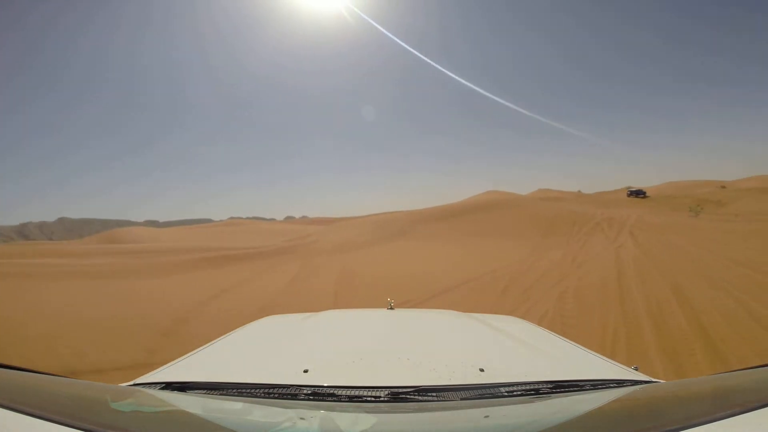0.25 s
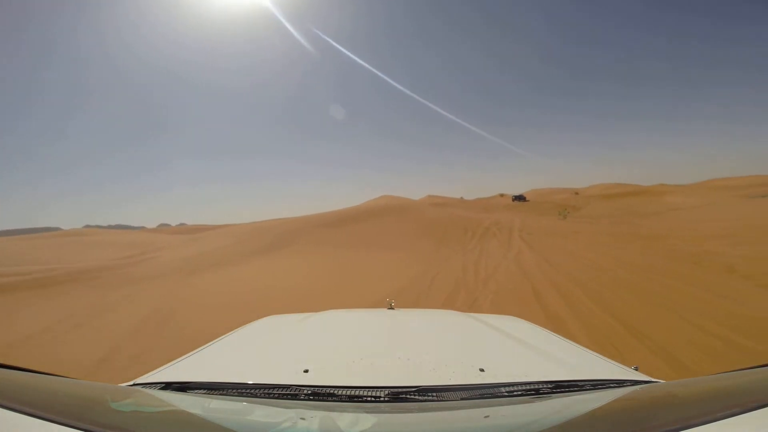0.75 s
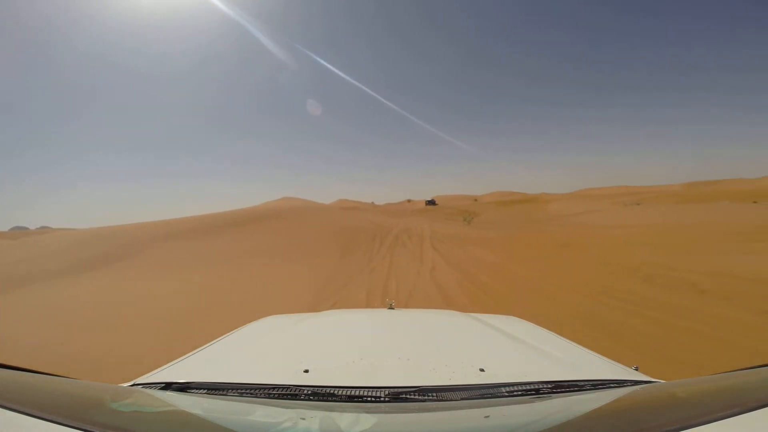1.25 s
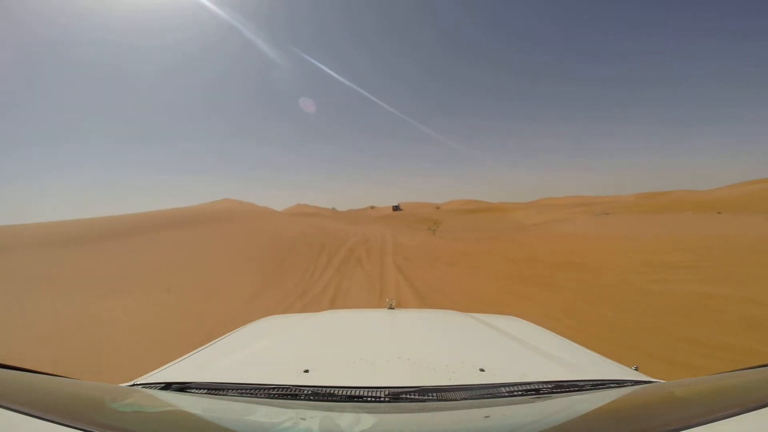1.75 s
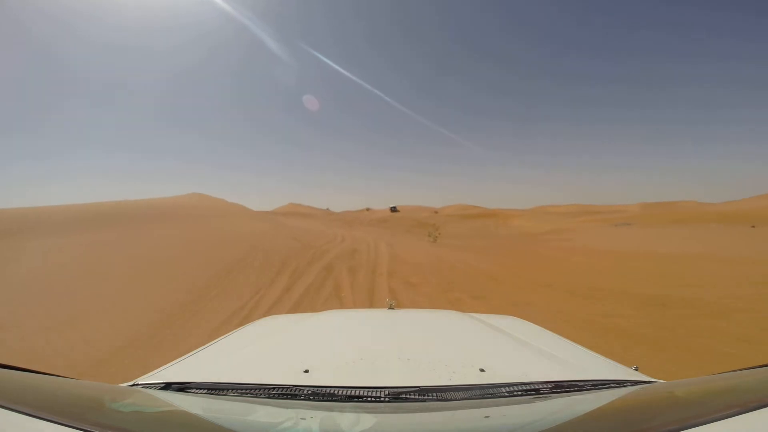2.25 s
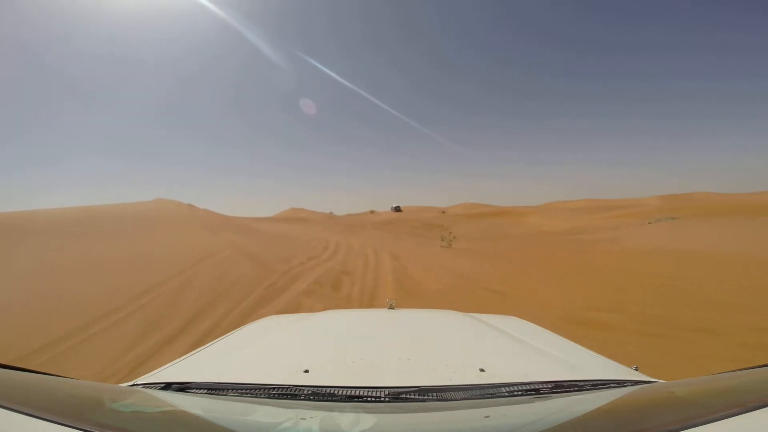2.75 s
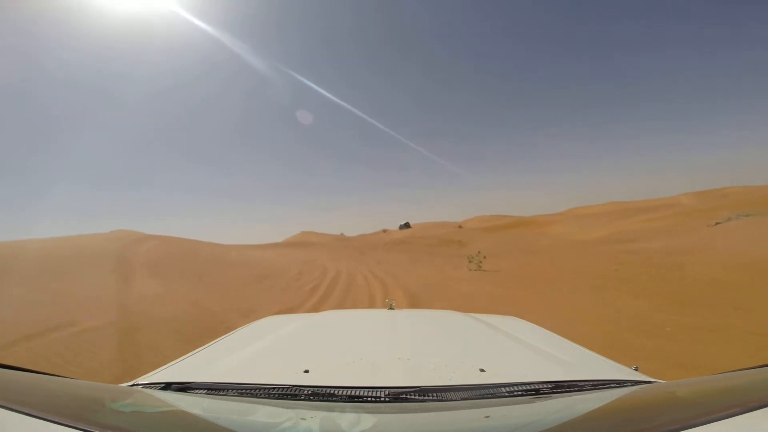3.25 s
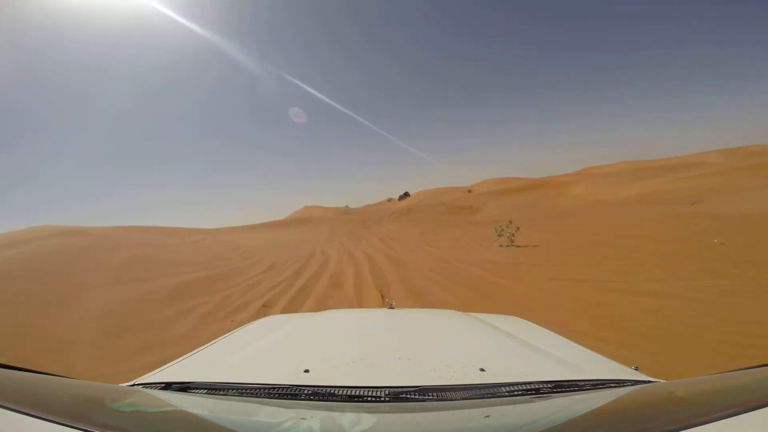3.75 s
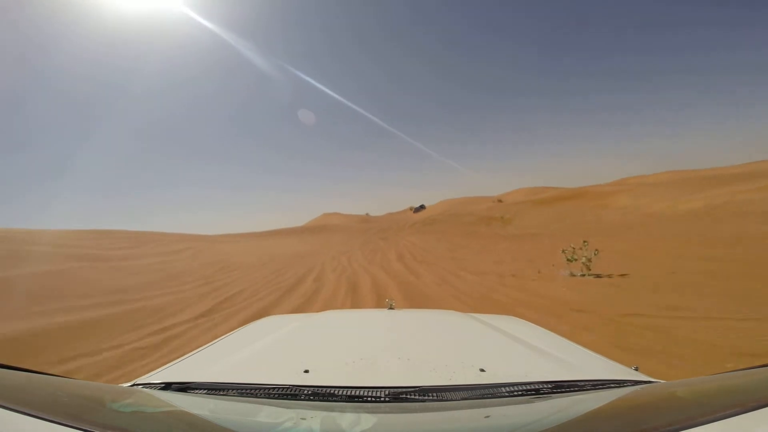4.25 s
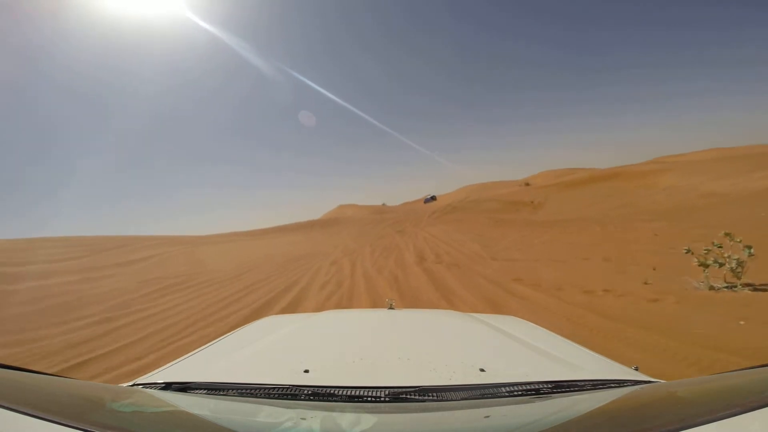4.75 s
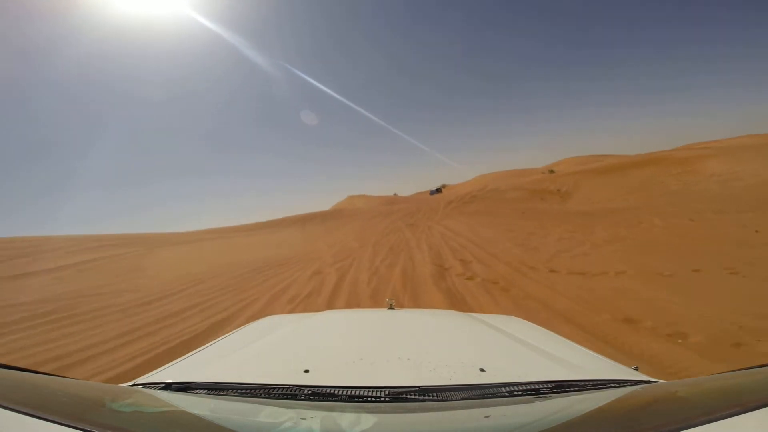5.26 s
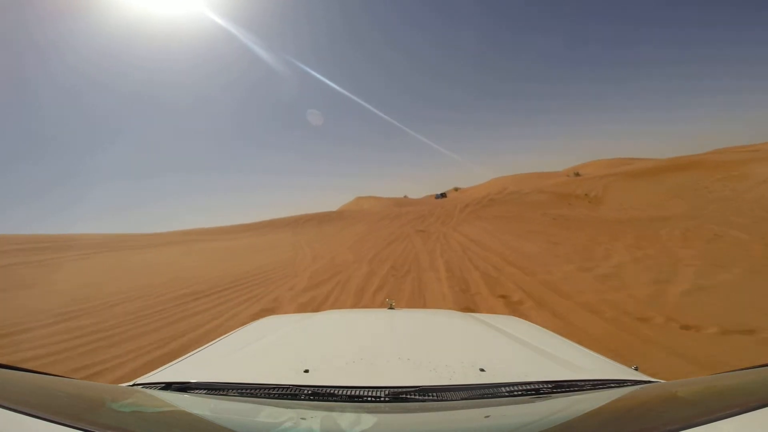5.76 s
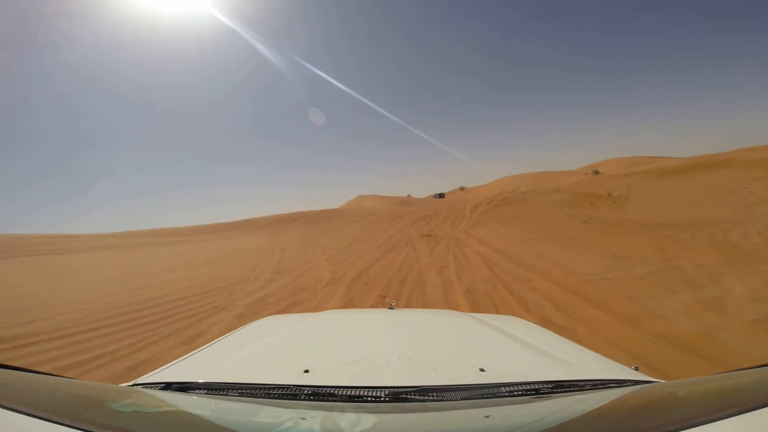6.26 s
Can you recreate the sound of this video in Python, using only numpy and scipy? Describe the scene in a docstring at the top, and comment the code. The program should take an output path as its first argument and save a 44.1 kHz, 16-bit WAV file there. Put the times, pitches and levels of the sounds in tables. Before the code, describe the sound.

A small camera mounted at the windscreen captures a bumpy dune drive: throbbing low cabin boom, rumbling floor, soft engine hum and fluttering air noise coloured by its plastic case. Early squeaks give way to a dry burst of mount crackle around two seconds, then scattered knocks and jolts, fuller hollow wind, sprays of sand hiss, and finally patchy creaking and little squeaks. A faint electronic whine lies beneath.

```python
"""The cabin boom comes first: a tone near 40 Hz that swells again and again as a car rolls over soft dunes.
Under it runs the engine, a sine firing note with two overtones; floor rumble, whoosh, roar and hiss are
shaped noise, roar and hiss coloured by the plastic case of a small camera at the windscreen.
Stick-slip clicks ring the modes of creaking trim and of the crackling mount, and rubbed tones squeak.
A thin electronic whine and microphone noise lie beneath."""
import sys
import numpy as np
from scipy import signal
from scipy.fft import rfft, irfft
from scipy.io import wavfile

SR = 44100
rng = np.random.default_rng(int(sys.argv[2]) if len(sys.argv) > 2 else 0)


def unload_wav(signal):
    """Save mono or channel-first audio to the path in sys.argv[1] as 16-bit WAV at rate SR, clipped to [-1, 1]."""
    wavfile.write(
        sys.argv[1],
        SR,
        np.round(np.clip(np.atleast_2d(signal).T, -1, 1) * 32767).astype(np.int16),
    )


N = 287532  # samples


def from_db(db):
    """Decibels to gain."""
    return 10 ** (np.asarray(db) / 20)


def rms_one(x):
    """Scaled to rms 1."""
    return x / np.sqrt(np.mean(x ** 2) + 1e-20)


def in_time(rows):
    """Columns of a breakpoint table, interpolated to every sample."""
    s, *columns = np.transpose(rows)
    return [np.interp(np.arange(N) / SR, s, c) for c in columns]


def drift(rate_hz):
    """Slow random wander of rms 1: noise through a double one-pole low-pass."""
    r = np.exp(-2 * np.pi * rate_hz / SR)
    settled = signal.lfilter([1], [1, -2 * r, r * r], rng.standard_normal(N + SR))[SR:]
    return rms_one(settled)


def coloured(spectrum, lifts=()):
    """Noise of rms 1 with a given spectrum and resonant lifts or dips."""
    hz = np.arange(1, N // 2 + 2) * SR / N
    point_hz, point_db = np.transpose(spectrum)
    db = np.interp(np.log(hz), np.log(point_hz), point_db, left=-99, right=-99)
    for centre_hz, width_hz, lift_db in lifts:
        db = db + lift_db / (1 + (2 * (hz - centre_hz) / width_hz) ** 2)
    return rms_one(irfft(rfft(rng.standard_normal(N)) * from_db(db), N))


def filtered(x, order, edge_hz, kind):
    """Butterworth filter."""
    return signal.sosfilt(signal.butter(order, edge_hz, kind, fs=SR, output="sos"), x)


def ring(clicks, hz, t60_s):
    """A resonant mode: a unit click starts a decaying sine of height near 1."""
    r = from_db(-60 / (t60_s * SR))
    w = 2 * np.pi * hz / SR
    return signal.lfilter([0, np.sin(w)], [1, -2 * r * np.cos(w), r * r], clicks + 1e-18)


def tone(hz):
    """A sine of rms 1 that follows a pitch curve."""
    turns = np.cumsum(hz * np.ones(N)) / SR + rng.random()
    return np.sqrt(2) * np.sin(2 * np.pi * turns)


def hump(centre_hz, width_hz):
    """A sliding band of noise: low-passed noise carried on a moving tone; rms 1."""
    phase = 2 * np.pi * np.cumsum(centre_hz) / SR
    slow = filtered(rng.standard_normal((2, N)), 3, width_hz / 2, "low")
    return rms_one(slow[0] * np.cos(phase) + slow[1] * np.sin(phase))


def slips(per_s, uneven_db):
    """Stick-slip clicks of either sign at random moments, uneven in size."""
    born = rng.random(N) < per_s / SR
    size = from_db(uneven_db * np.minimum(rng.exponential(1, N), 4))
    return born * size * rng.choice([-1, 1], N)


def swells(rows, edge_s, fall_s=None):
    """Sum of rounded swells, timed at half height; one shorter than its edges stays below full height."""
    rise_s, fall_s = edge_s, fall_s or edge_s
    out = np.zeros(N)
    for start, length, height in rows:
        first = max(int((start - rise_s) * SR), 0)
        last = min(int((start + length + fall_s) * SR), N)
        at = np.arange(first, last)
        rise = (at / SR - start) / rise_s
        fall = (start + length - at / SR) / fall_s
        ramp = np.clip(np.minimum(rise, fall) + .5, 0, 1)
        out[at] += height * np.sin(np.pi / 2 * ramp) ** 2
    return out


# swells of the cabin boom, the long ones in several overlapping parts:
# start t/s, length t/s, level/dB, f/Hz
BOOM_SWELLS = [(0.01, 0.053, -7, 39.2), (0.158, 0.1, -13.5, 39.7), (0.316, 0.2, -16, 38.8),
               (0.554, 0.13, -18.5, 38.8), (0.717, 0.034, -19, 38), (0.811, 0.059, -22.5, 39.1),
               (0.893, 0.11, -15.5, 39.2), (1.033, 0.2, -19, 38.25), (1.259, 0.33, -17, 40.15),
               (1.589, 0.14, -28.5, 40.6), (1.848, 0.078, -15, 39.9), (1.96, 0.074, -19.5, 40.1),
               (2.076, 0.27, -19, 40.7), (2.45, 0.031, -19.5, 38.7), (2.753, 0.086, -18, 39.2),
               (2.929, 0.043, -15, 37.9), (3.121, 0.12, -16.5, 37.94), (3.242, 0.13, -12.5, 37.95),
               (3.386, 0.1, -14, 39.6), (3.581, 0.055, -15.5, 37.5), (3.728, 0.25, -12.5, 40.8),
               (4.056, 0.24, -9, 41.33), (4.336, .21, -13.5, 39.76), (4.592, .25, -22.5, 40.48),
               (4.89, .15, -17, 40.4), (5.228, 0.12, -22, 40.03), (5.368, .14, -18, 40.8),
               (5.594, 0.34, -29, 41.45), (5.892, 0.083, -16, 39.3), (6.008, 0.19, -23, 37.8),
               (6.276, 0.13, -17, 39.2), (6.488, 0.099, -20, 39.2)]


def boom():
    """The cabin's low mode as a sine that swells and subsides, its pitch unsettled by uneven ground."""
    start, length, level_db, pitch_hz = np.transpose(BOOM_SWELLS)
    hz, = in_time(np.c_[start + length / 2, pitch_hz])
    size = swells(np.c_[start, length, from_db(level_db)], edge_s=0.087, fall_s=0.091)
    size = size + from_db(-43.5)  # level between swells
    return size * from_db(1.37 * drift(15.6)) * tone(hz + 1.14 * drift(8.5))


# firing note of the engine: t/s, f/Hz, level/dB
FIRING_NOTE = [(0, 77, -42), (.44, 77.3, -35), (.9, 77.8, -42), (1.47, 78.5, -42), (1.9, 81, -37),
               (2.3, 82.7, -35.5), (2.8, 84.8, -36.5), (3.5, 86.6, -37.5), (4.3, 87.2, -38.5),
               (5.0, 87, -37), (5.7, 86.8, -37), (6.52, 86.8, -34.5)]
# engine overtones: multiple of the firing f, level/dB against the firing note
OVERTONES = [(2, -16), (3, -13)]


def engine():
    """The firing note and two overtones, wavering together in strength."""
    hz, level_db = in_time(FIRING_NOTE)
    notes = tone(hz) + sum(from_db(db) * tone(k * hz) for k, db in OVERTONES)
    return from_db(level_db + 0.64 * drift(2.6)) * notes


# airflow: t/s, roar level/dB, top hiss level/dB
AIRFLOW = [(0, -44.5, -84), (.3, -43, -85), (.6, -41, -64.5), (.9, -41.5, -62), (1.12, -45, -76),
           (1.4, -39, -79), (1.7, -40.5, -69), (2.0, -37, -78), (2.4, -36, -67.5), (2.9, -34, -63),
           (3.5, -34.5, -61), (4.1, -36.5, -62.5), (4.6, -36.5, -61.5), (5.2, -37, -58.5),
           (5.65, -38.5, -66), (6.2, -37, -65), (6.52, -40, -59)]


def airflow():
    """Roar and top hiss levels, and how far each stands from its reference, in dB."""
    roar_db, top_db = in_time(AIRFLOW)
    return roar_db, top_db, roar_db + 37, top_db + 66


# spectrum of the floor rumble: f/Hz, relative level/dB per Hz
RUMBLE_SPECTRUM = [(8.8, -45), (15, 0.5), (27, -14), (46, 3.5), (56, -9.5), (70, -13.5), (100, -21),
                   (130, -22.5), (188, -22.5), (268, -24.5), (541, -42.5), (1000, -47), (1300, -90),
                   (2200, -120)]


def rumble():
    """Low noise through the floor, stronger with the airflow and over a rougher stretch of sand."""
    flow_db = airflow()[2]
    rough_db = swells([(2.2, 0.72, 2.58)], edge_s=0.14)  # start s, length s, lift dB
    level_db = -27 + 0.35 * flow_db + rough_db + 2.5 * drift(1.8)
    dips = [(45.7, 14.0, -9.0), (189.4, 29, -4.0)]  # Hz, width Hz, dB
    return from_db(level_db) * coloured(RUMBLE_SPECTRUM, dips)


# whoosh of the air, sliding in pitch, width and level:
# t/s, centre f/Hz, share of broad noise [0-1], level/dB
WHOOSH_CURVE = [(0, 225, 0.3, -40.5), (.7, 250, 0.14, -37), (1.5, 285, 0.23, -33), (2.2, 295, 0.26, -35),
                (2.8, 275, 0.86, -38), (3.5, 265, 0.7, -35.5), (4.2, 285, 0.24, -38),
                (4.8, 280, 0.51, -34.5), (5.5, 260, 0.06, -32), (6.1, 240, 0.09, -33),
                (6.52, 270, 0.6, -37.5)]
# a higher, thinner hump of the whoosh: t/s, centre f/Hz, level/dB
UPPER_HUMP = [(0, 290, -49.5), (1.3, 333.8, -45), (2.1, 358.8, -45), (2.7, 371, -37), (3.3, 395, -42.5),
              (4.3, 355.1, -39.5), (5.0, 329.4, -42.5), (5.8, 305.4, -44.5), (6.52, 329.4, -44.5)]


def whoosh():
    """Noise in a hump that slides and widens, with a thinner hump above it."""
    centre_hz, broad, level_db = in_time(WHOOSH_CURVE)
    upper_hz, upper_db = in_time(UPPER_HUMP)
    narrow_noise = np.sqrt(1 - broad) * hump(centre_hz, width_hz=70.4)
    broad_noise = np.sqrt(broad) * hump(centre_hz, width_hz=143)
    upper_noise = from_db(upper_db) * hump(upper_hz, width_hz=62.0)
    return from_db(level_db) * (narrow_noise + broad_noise) + upper_noise


# jolts that briefly lift roar and hiss: start t/s, length t/s, lift level/dB
JOLT_SWELLS = [(.5, 0.033, 2.5), (2.272, 0.014, 5), (2.326, .015, 2.5), (2.485, 0.0077, 4),
               (2.6, 0.06, 1.5), (2.72, 0.115, 1), (2.9, 0.02, 2.5), (5.508, 0.016, 4.5)]


def jolt_lift():
    """The brief rise in dB of the air noise on each jolt."""
    return swells(JOLT_SWELLS, edge_s=0.007)


# spectrum of the air roar: f/Hz, relative level/dB per Hz
ROAR_SPECTRUM = [(260, -15), (450, -2.5), (903, -7), (1160, -5.5), (1320, -6), (1470, -1.5), (1940, -3.5),
                 (2310, -1), (3600, -28.5), (4680, -66), (7920, -120)]
# resonances of the plastic case: f/Hz, width f/Hz, lift level/dB
CASE_RESONANCES = [(1160, 194, 6.5), (700, 110, 2), (2345, 36, 2.5), (2580, 260, 1.5), (2796, 59, 4.5),
                   (3910, 120, 7.5), (7970, 250, 5.5), (9030, 270, 5.5)]
# ringing hollow of the case: t/s, level/dB
HOLLOW_LEVEL = [(0, -69), (1.2, -54), (2.0, -49), (2.6, -46), (3.1, -42), (3.8, -42.5), (4.3, -45),
                (5.2, -49), (6.52, -67)]


def roar(gust):
    """Air noise coloured by the case, and noise ringing in one of its hollows."""
    hollow_db = in_time(HOLLOW_LEVEL)[0] + drift(12)
    hollow = from_db(hollow_db) * rms_one(ring(rng.standard_normal(N), 1462, t60_s=0.022))
    roar_db = airflow()[0] + jolt_lift() + 0.71 * gust + 0.68 * drift(38)
    return hollow + from_db(roar_db) * coloured(ROAR_SPECTRUM, CASE_RESONANCES)


# spells of harder trim creaking: start t/s, length t/s, lift level/dB
CREAK_SPELLS = [(.25, 0.69, 10), (.47, 0.12, 7), (.62, 0.05, 7.5), (2.02, 0.022, 11), (4.7, 1.4, 10.5),
                (1.8, 0.035, 17.5), (1.855, 0.043, 18.5), (2.32, 0.039, 10), (2.53, 0.013, 9),
                (2.72, .11, 15), (4.35, 0.021, 13), (5.5, 0.087, 6.5), (5.79, 0.024, 7), (5.95, 0.21, 6),
                (6.11, 0.064, 7), (6.2, 0.095, 17.5)]


def creak_lift():
    """The rise in dB of the trim's slips while it creaks harder."""
    return swells(CREAK_SPELLS, edge_s=0.0073)


# spectrum of the air and tyre hiss: f/Hz, relative level/dB per Hz
HISS_SPECTRUM = [(1650, -10), (2800, -1), (3620, -2), (3910, -5.5), (4380, -2), (4980, -12.5), (5940, -6),
                 (6900, -8), (8480, -25.5), (9370, -16), (12300, -39.5), (13900, -42), (14400, -33),
                 (14900, -31), (15200, -55)]
# sand spraying against the body: start t/s, length t/s, lift of the top hiss level/dB
SAND_SPRAYS = [(.27, 0.088, 9), (.46, 0.1, 6), (2.8, 0.048, 7.5), (4.47, 0.063, 6.5), (4.71, 0.069, 7),
               (4.88, 0.58, 3), (5.5, 0.036, 3)]
# two narrow hiss bands swell and fade: t/s, lower band lift level/dB, upper band lift level/dB
BAND_SHADING = [(0, -2, -4), (1.8, 6, -3), (2.4, 4, -0.5), (4.4, 4.5, 2), (5.0, -2, -1), (6.52, -1, -6)]
# edges of those two bands, lower band first: low edge f/Hz, high edge f/Hz
SHADED_BANDS = [(5350, 5750), (6350, 6750)]


def hiss(gust):
    """Hiss coloured by the case and split at 8.2 kHz; airflow and sand sprays drive the two parts."""
    _, top_db, flow_db, top_flow_db = airflow()
    spray_db = swells(SAND_SPRAYS, edge_s=0.017)
    low_db = -48 + flow_db + 0.2 * top_flow_db
    low_db = low_db + 0.35 * spray_db + jolt_lift() + 0.029 * creak_lift()
    top_db = top_db + spray_db + 1.15 * drift(13.0)
    noise = from_db(0.5 * gust + 0.7 * drift(46)) * coloured(HISS_SPECTRUM, CASE_RESONANCES)
    low = rms_one(filtered(noise, 4, 8200, "low"))
    top = rms_one(filtered(noise, 4, 8200, "high"))
    for lift_db, band_hz in zip(in_time(BAND_SHADING), SHADED_BANDS):
        band_pass = signal.butter(2, band_hz, "band", fs=SR, output="sos")
        low = low + (from_db(lift_db) - 1) * signal.sosfiltfilt(band_pass, low)
    return from_db(low_db) * low + from_db(top_db) * top


def ride():
    """Floor rumble, whoosh, air roar and hiss; roar and hiss flutter together."""
    gust = drift(8.4)
    return rumble() + whoosh() + roar(gust) + hiss(gust)


# whine of the camera electronics: f/Hz, rms level/dB
CAMERA_WHINE = [(11719, -83.5), (14626, -80.5), (14655, -90)]
# spectrum of the microphone noise: f/Hz, relative level/dB per Hz
MICROPHONE_NOISE = [(3000, -6), (10000, 11), (12500, 6), (14400, 4), (15300, -15)]


def camera():
    """Steady sines from the electronics over the microphone's own noise."""
    whine = sum(from_db(db) * tone(hz) for hz, db in CAMERA_WHINE)
    return whine + from_db(-73.0) * coloured(MICROPHONE_NOISE)


# modes of the trim panels: f/Hz, level/dB, t60 t/s
TRIM_MODES = [(2057, -8, 0.061), (2374, 1, 0.028), (2530, -3.5, 0.016), (2630, -2.5, 0.027),
              (2840, -15.5, 0.1)]
# knocks of the trim: t/s, strength level/dB before the drive trim and the modes
TRIM_KNOCKS = [(0.2617, -25), (2.036, -15), (2.275, -24), (2.33, -21), (2.464, -31), (2.5366, -15),
               (2.5964, -24), (2.7344, -21), (2.7551, -23), (2.776, -23), (2.907, -23), (2.9418, -25),
               (4.357, -22), (4.7402, -21), (5.0614, -32), (5.5114, -19)]


def creak():
    """Rubbing trim panels: a patter of soft slips and a few knocks ring their modes."""
    flow_db = airflow()[2]
    level_db = -62.5 + 1.2 * flow_db + creak_lift()
    clicks = from_db(level_db) * slips(700 * from_db(2 * drift(20)), uneven_db=2)
    s, knock_db = np.transpose(TRIM_KNOCKS)
    clicks[(s * SR).astype(int)] += from_db(knock_db - 13)  # drive trim
    rings = np.zeros(N)
    for hz, db, t60_s in TRIM_MODES:
        uneven_clicks = clicks * from_db(db + rng.normal(0, 3, N))
        rings += ring(uneven_clicks, hz, t60_s)
    return filtered(rings, 3, [1900, 3100], "band")


# bursts of mount crackle: start t/s, end t/s, grain level/dB before the modes
CRACKLE_BURSTS = [(0.184, 0.22, -61.5), (0.832, 0.9, -55.5), (0.935, 1.097, -58.5), (1.25, 2.32, -59.5),
                  (1.469, 1.566, -52), (1.573, 1.643, -51.5), (1.68, 1.695, -55), (1.865, 1.88, -59),
                  (1.929, 1.947, -53), (2.003, 2.01, -54), (2.085, 2.125, -57), (2.14, 2.185, -58),
                  (2.2, 2.252, -54.5), (2.477, 2.518, -58.5)]
# single cracks: t/s, strength level/dB, top strength level/dB (relative); both before trims and modes
SINGLE_CRACKS = [(0.3226, -27.5, -4), (0.9008, -27, -10), (1.0511, -35, -11), (1.1633, -34, -9),
                 (1.2954, -40, -12), (1.3914, -37, -13), (1.401, -35, -14), (1.4259, -37, -5),
                 (1.4783, -39, -13), (1.4825, -32, -13), (1.492, -26, -15), (1.5007, -27, -19),
                 (1.509, -27, -6), (1.517, -28, -5), (1.523, -22.5, -15), (1.5322, -29, -3),
                 (1.544, -28, -15), (1.5534, -30, -9), (1.5579, -28, -16), (1.575, -22, -14),
                 (1.59, -23, -3), (1.6015, -34, -5), (1.6167, -33, -8), (1.631, -21, -13), (1.636, -26, -9),
                 (1.657, -27, -5), (1.6696, -32, -5), (1.6829, -27, -10), (1.6889, -28, -10),
                 (1.7212, -27, -8), (1.7318, -30, -5), (1.7445, -26, -9), (1.7565, -30, -18),
                 (1.772, -26, -9), (1.7994, -28, -5), (1.8039, -24, -11), (1.8128, -29, -4),
                 (1.8466, -28, -7), (1.8612, -29, -15), (1.8729, -32, -7), (1.878, -24, -21),
                 (1.9144, -31, -5), (1.92, -30, -14), (1.9253, -25, -13), (1.937, -26, -9),
                 (1.9504, -31, -2), (1.959, -21, -21), (1.973, -31, -6), (1.994, -30.5, -7),
                 (2.0072, -30, -6), (2.0131, -31, -7), (2.029, -29, -14), (2.0623, -31, -5),
                 (2.0832, -37, -1), (2.0878, -24, -11), (2.0949, -20.5, -10), (2.108, -33, -4),
                 (2.1613, -30, -17), (2.1807, -33, -7), (2.206, -32, -6), (2.2112, -30, -15),
                 (2.2257, -31, -7), (2.2333, -23, -17), (2.239, -29, -17), (2.2436, -34, -5),
                 (2.2618, -33, -23), (2.3316, -27, -23), (2.5053, -35, -12), (5.511, -32, -17)]
# modes of the plastic mount: f/Hz, level/dB, t60 t/s
MOUNT_MODES = [(4250, 0.5, 0.0045), (6300, -0.5, 0.004), (8900, -7, 0.0013), (11300, -7.5, 0.0011),
               (13300, -10, 0.0012), (14900, -15, 0.001)]


def crackle_grains():
    """Slips in bursts: the harder the plastic works, the more often it slips."""
    start, end, grain_db = np.transpose(CRACKLE_BURSTS)  # short bursts stand over longer spells
    size = swells(np.c_[start, end - start, from_db(grain_db)], edge_s=0.0078)
    per_s = 2000 * np.sqrt(size / size.max())
    return size * slips(per_s * from_db(2.5 * drift(40)), uneven_db=3.0)


def mount():
    """Stick-slip in the plastic: loud single cracks and bursts of crackle ring its modes."""
    grains = crackle_grains()
    s, crack_db, top_db = np.transpose(SINGLE_CRACKS)
    at = (s * SR).astype(int)
    spread_db = rng.normal(0, 2.3, (len(at), len(MOUNT_MODES)))
    # a crack reaches the modes at slightly different moments, up to 0.4 ms late
    late = (rng.random(spread_db.shape) * .0004 * SR).astype(int)
    tail = np.exp(-1 / (.0015 * SR))  # 1.5 ms decay of the crumbling
    out = np.zeros(N)
    for k, (hz, db, t60_s) in enumerate(MOUNT_MODES):
        hit_db = crack_db + db - 5.5 + spread_db[:, k]
        if hz > 8000:
            hit_db = hit_db + top_db + 8
        cracks = np.zeros(N)
        cracks[at + late[:, k]] = from_db(hit_db)
        # each crack crumbles into finer slips
        crumbs = signal.lfilter([1], [1, -tail], cracks) * slips(4000, uneven_db=2)
        crackle = grains * from_db(db + rng.normal(0, 3.7, N))
        out += ring(crackle + cracks + 0.27 * crumbs, hz, t60_s)
    return filtered(out, 2, 3200, "high")


# trim squeaks: t/s, peak level/dB before roughening, mid-squeak f/Hz, length t/s
TRIM_SQUEAKS = [(.472, -37, 2630, .012), (0.507, -33, 2460, .014), (0.591, -24.5, 2690, 0.0052),
                (0.694, -33, 2380, .014), (0.706, -38, 2700, .010), (5.511, -36, 4580, 0.006),
                (5.772, -31.5, 2417, 0.016), (5.802, -33, 2890, 0.017), (6.006, -29, 2540, 0.031),
                (6.024, -30, 2540, 0.0426), (6.042, -33, 2603, 0.024), (6.11, -42, 4570, 0.013),
                (6.125, -34, 2360, .02), (6.155, -33.5, 2440, 0.024), (6.229, -33, 2610, 0.024)]


def squeaks():
    """Short rubbed tones that rise softly, climb 3 % in pitch and fade, roughened in level."""
    out = np.zeros(N)
    for s, peak_db, hz, length in TRIM_SQUEAKS:
        t = np.arange(int(max(length, .004) * SR)) / SR
        progress = t / t[-1]
        shape = np.sin(np.pi * progress ** .6) ** 2
        squeak = np.sin(2 * np.pi * hz * t * (1 + 0.03 * (progress - 1) / 2))
        at = int(s * SR)
        out[at:at + len(t)] += (from_db(peak_db) * shape * squeak)[:N - at]
    return out * from_db(2 * drift(250))


def scene():
    """All sources at the one microphone."""
    return (boom() + engine() + ride() + camera() + creak() + mount() + squeaks())[None]


def record(dry):
    """A steep low-pass cuts the top, 60 dB down from 15.8 kHz."""
    return signal.sosfilt(signal.cheby2(14, 60, 15800, fs=SR, output="sos"), dry)


dry = scene()
out = record(dry)
unload_wav(out)
```